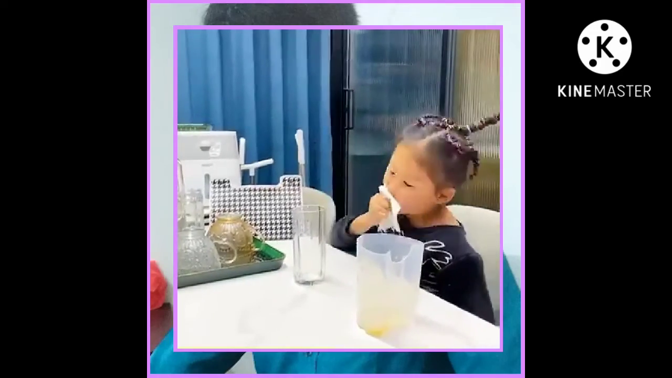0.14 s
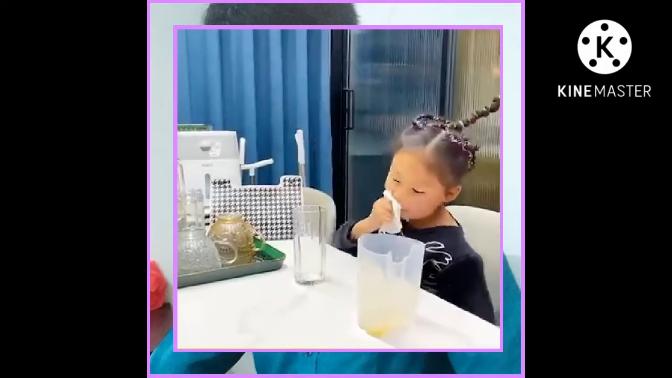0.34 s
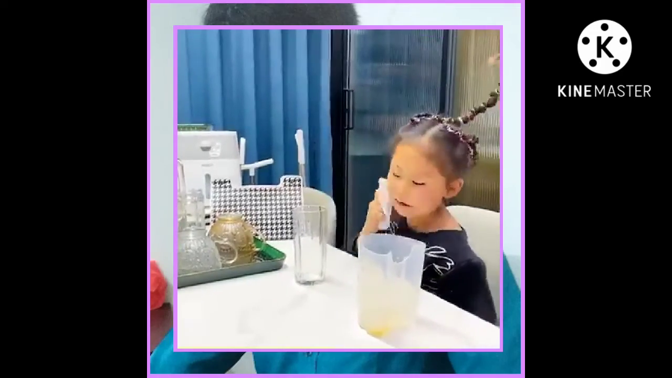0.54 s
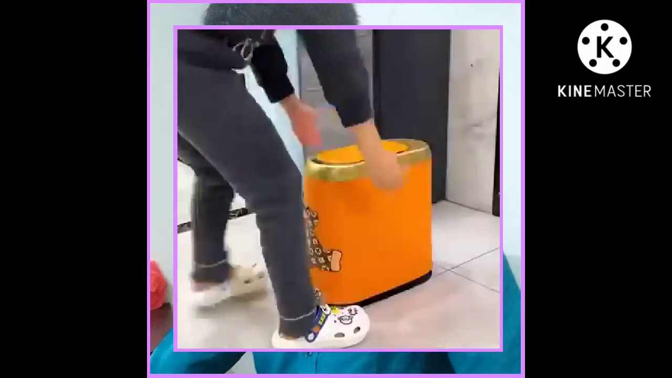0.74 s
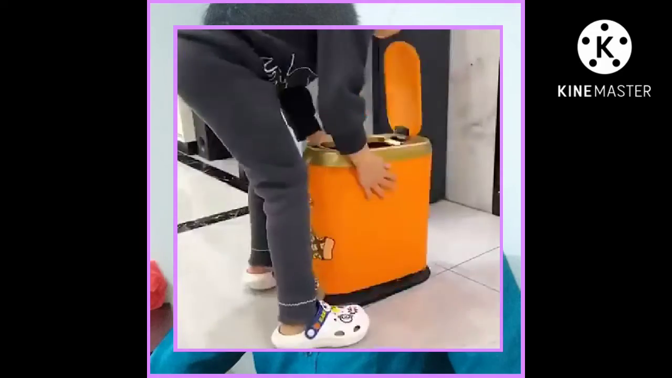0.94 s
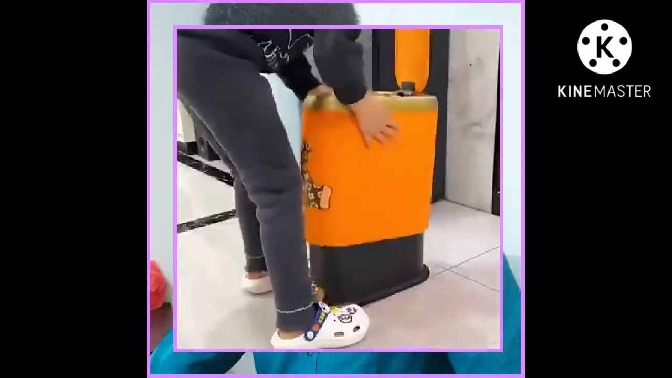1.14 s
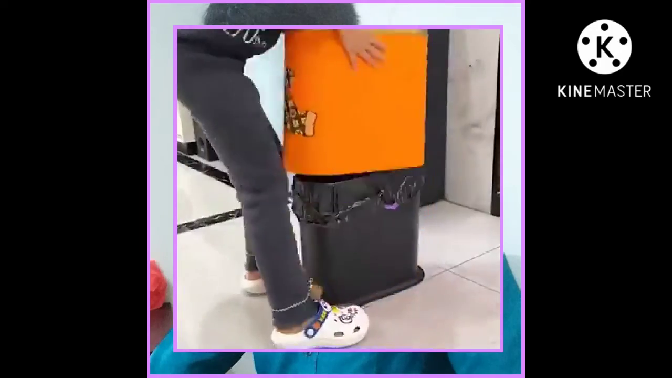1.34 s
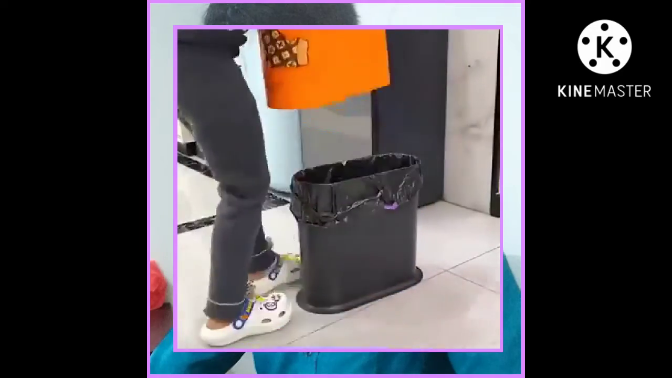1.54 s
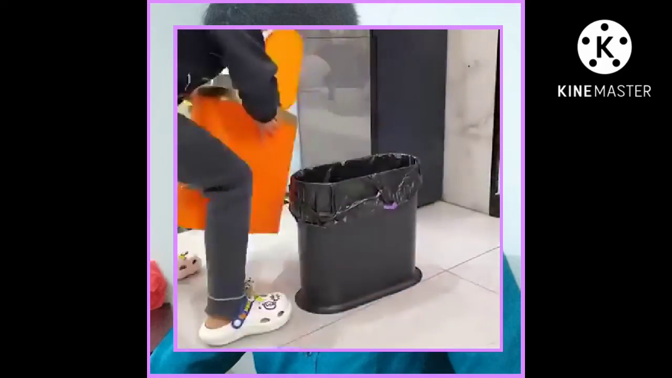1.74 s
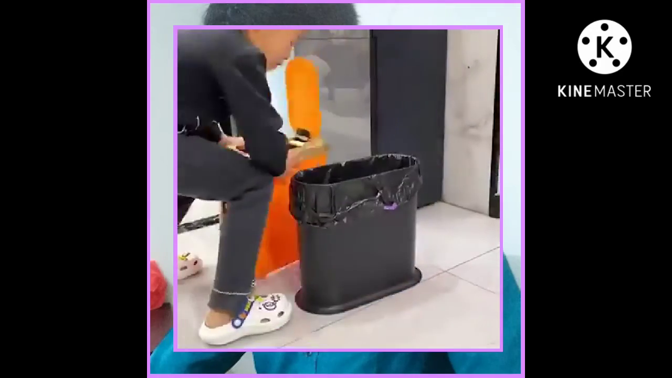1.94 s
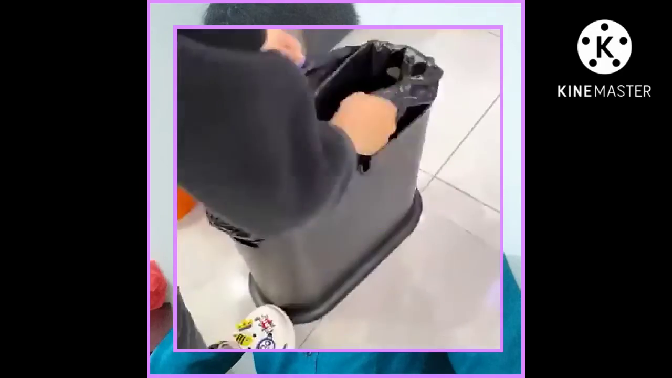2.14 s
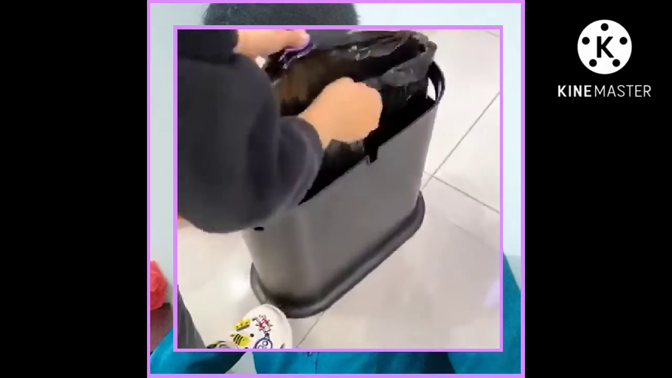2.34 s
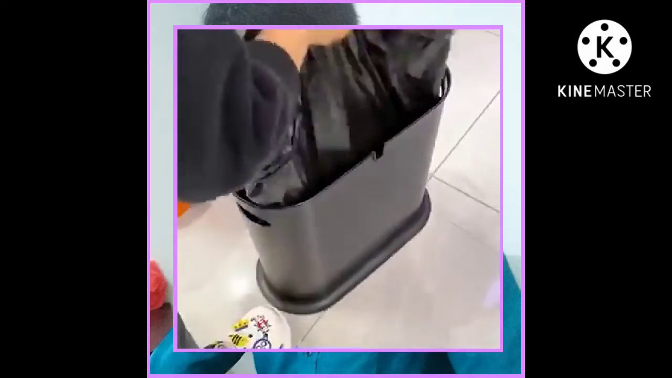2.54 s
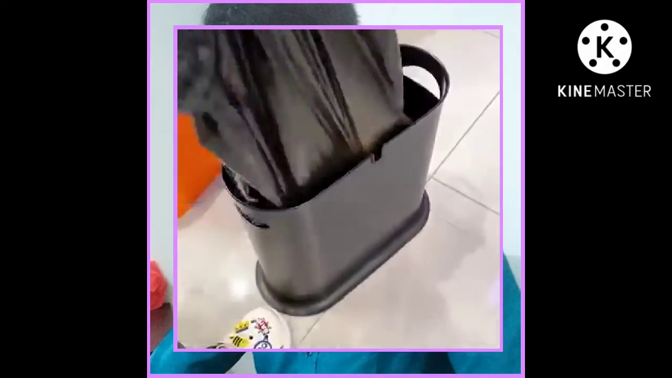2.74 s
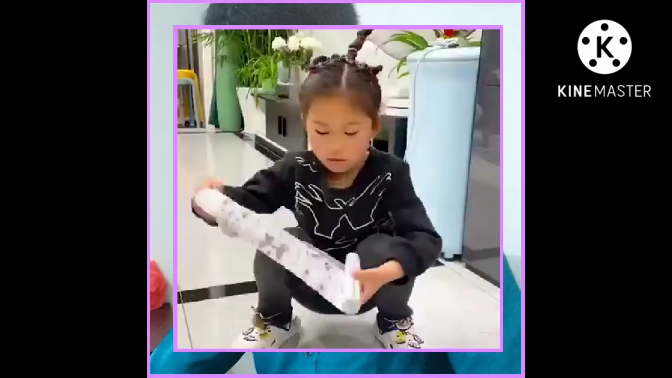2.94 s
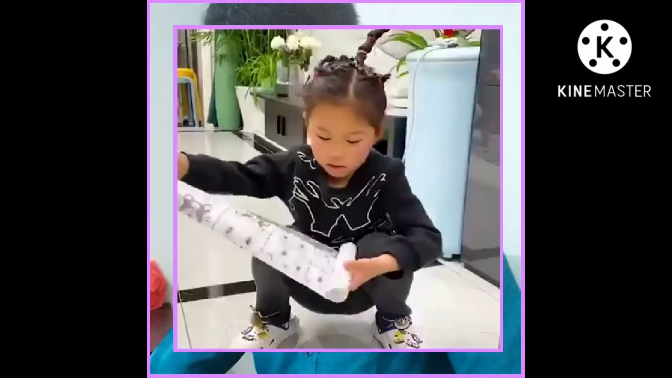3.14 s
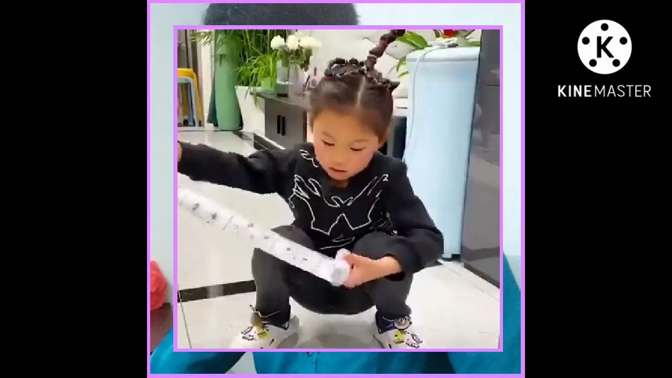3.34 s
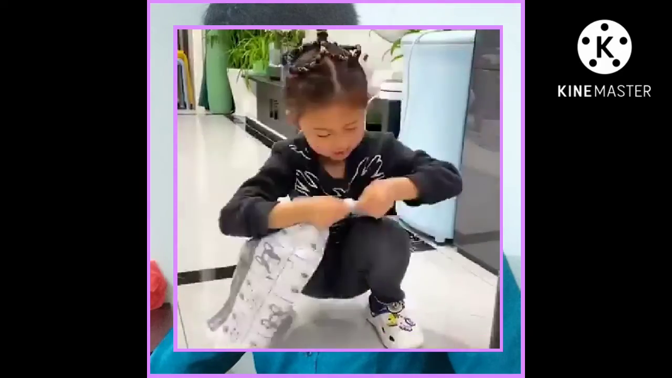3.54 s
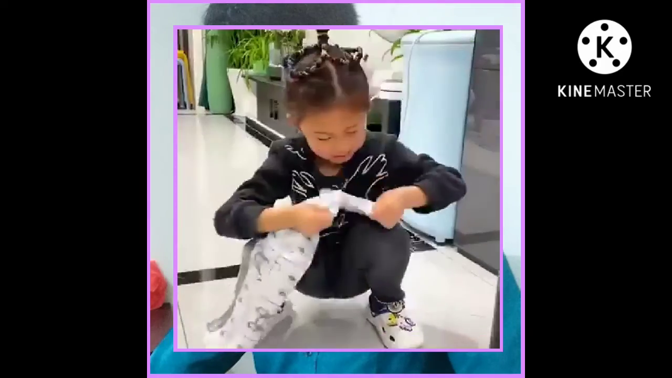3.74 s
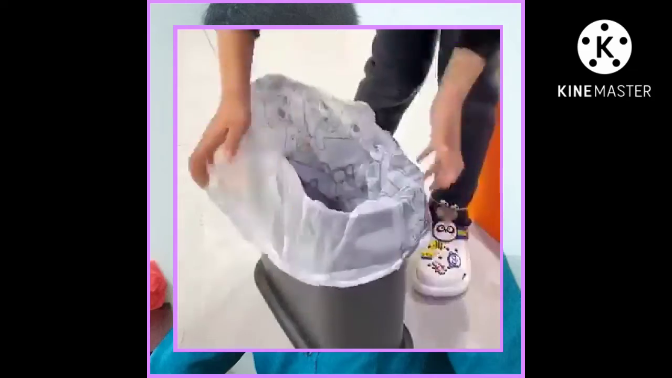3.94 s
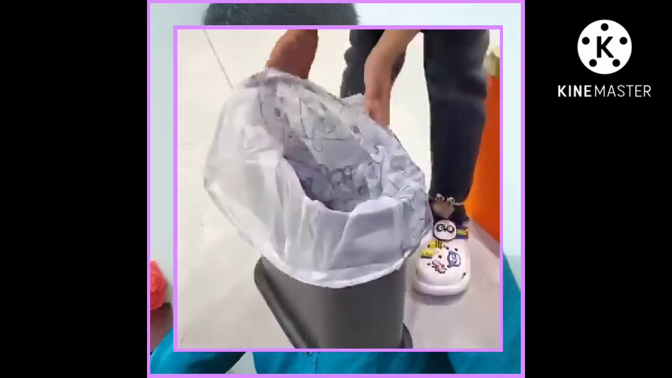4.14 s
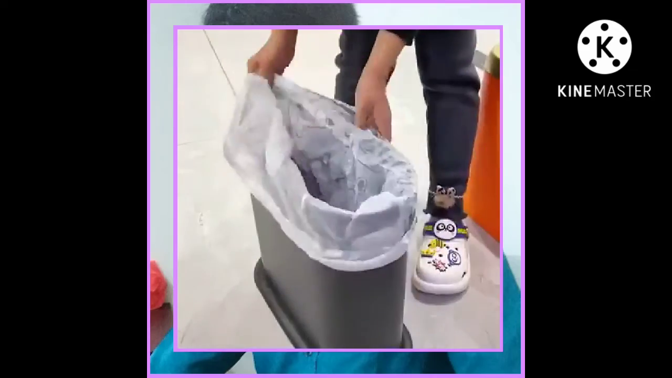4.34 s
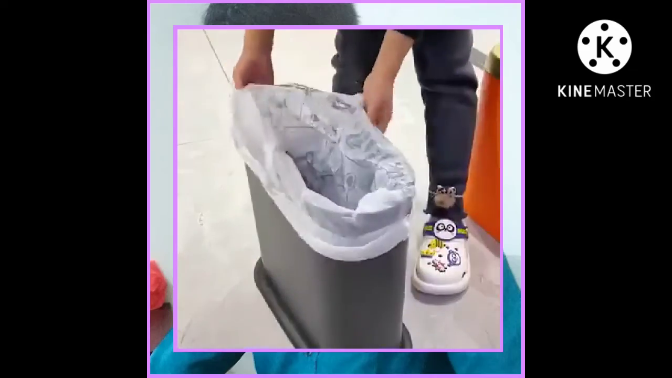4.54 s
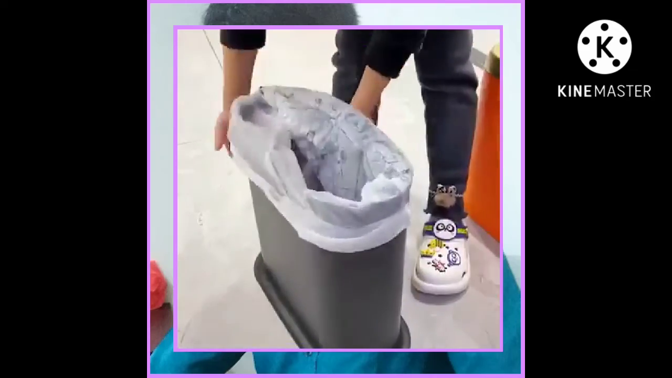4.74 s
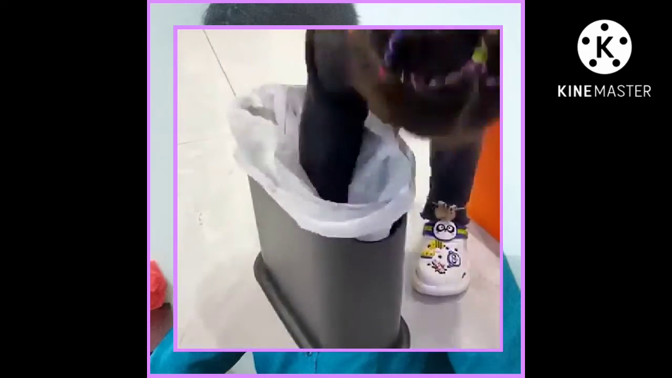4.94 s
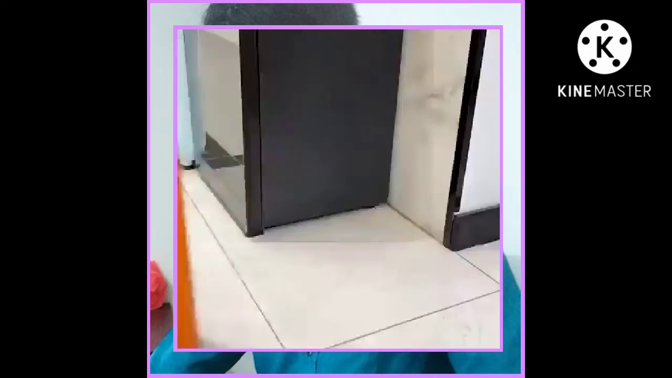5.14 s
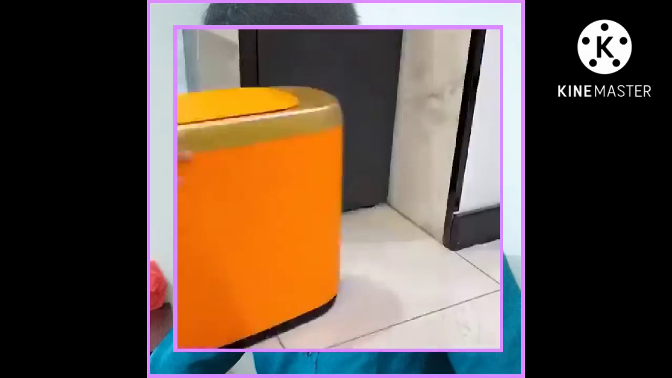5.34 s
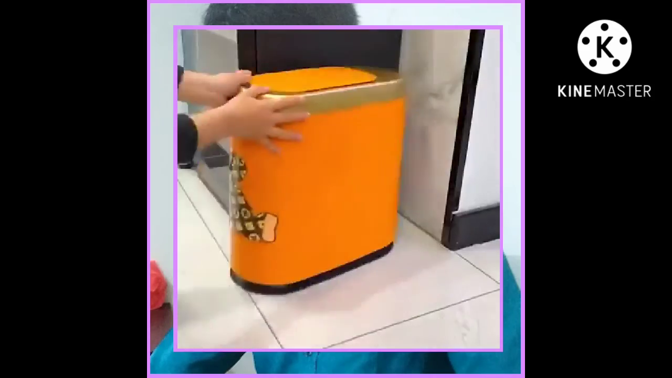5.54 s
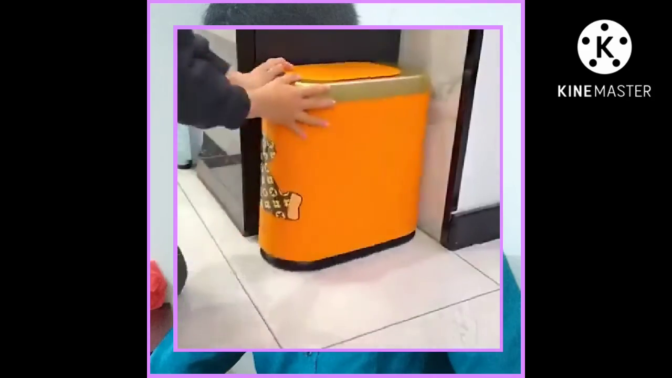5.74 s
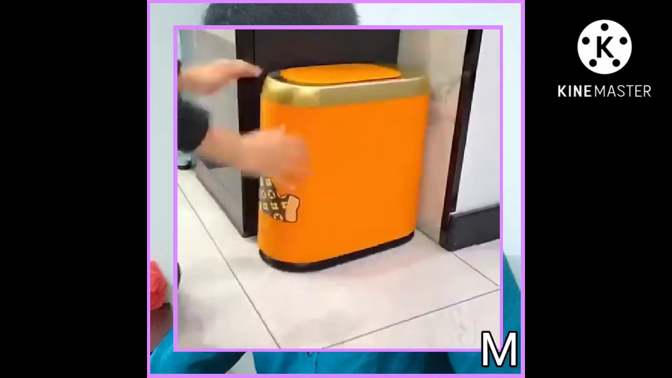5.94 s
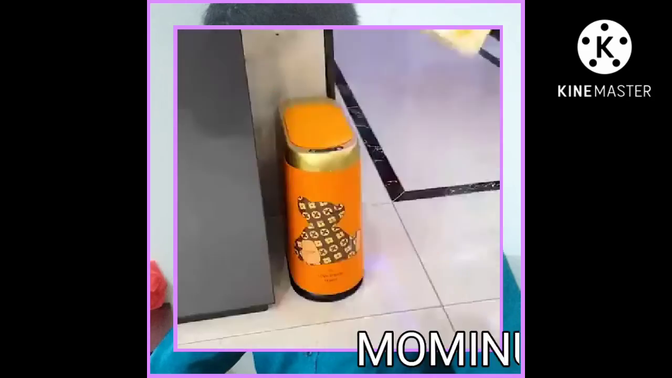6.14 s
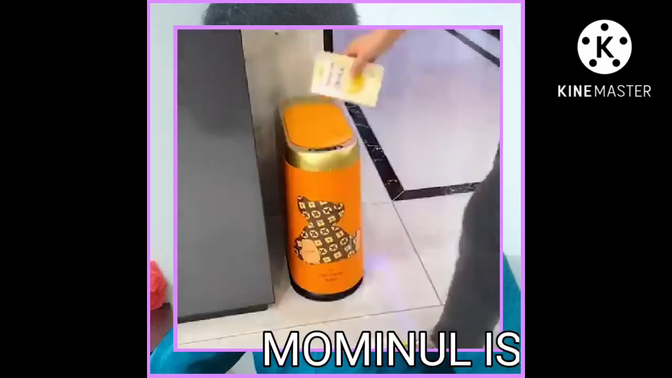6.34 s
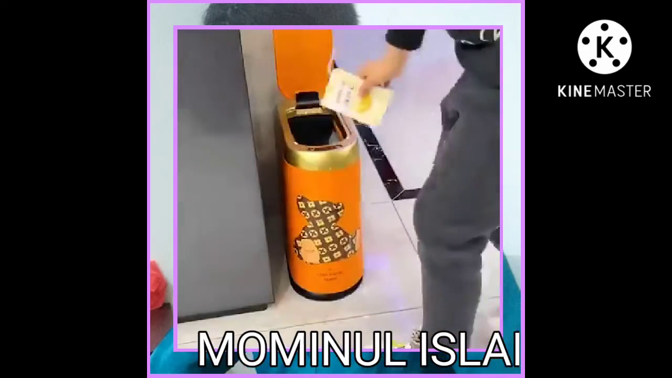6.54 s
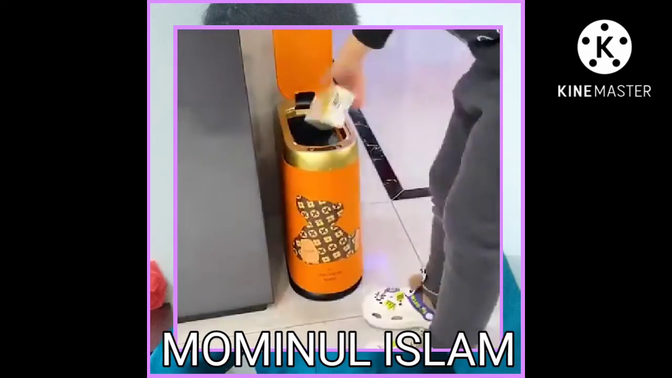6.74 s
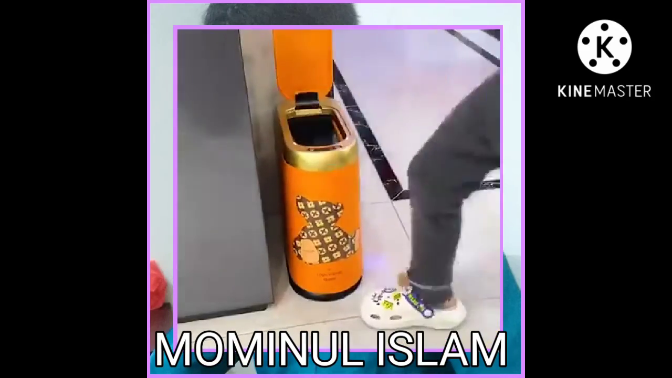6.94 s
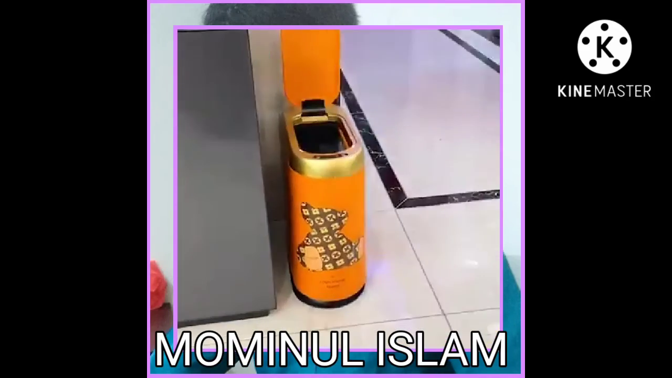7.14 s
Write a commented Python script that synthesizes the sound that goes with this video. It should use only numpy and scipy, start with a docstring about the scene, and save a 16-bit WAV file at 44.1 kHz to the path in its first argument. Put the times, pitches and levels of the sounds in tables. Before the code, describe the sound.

A plastic bin cover slides off with hollow knocks, then thin liner film crinkles loudly before the cover drags back and something drops in.

```python
"""Sleeves brush faintly over a low hum, then a wastebasket gets a new liner in a tiled room: the plastic cover
is lifted off, the old bag pulled out, a thin new one torn from the roll and spread over the rim,
the cover slid back across the floor, and litter drops in.
Strokes gate random snaps through resonant bands for film and plastic, and so shake the hollow walls;
knocks boom, clack and rattle, light ticks fall between, and a small hard room answers."""
import sys
import numpy as np
from scipy import signal
from scipy.io import wavfile

SR = 44100
rng = np.random.default_rng(int(sys.argv[2]) if len(sys.argv) > 2 else 0)


def persist_wave(psi):
    """Save psi, clipped to +-1, as 16-bit WAV."""
    counts = np.round(np.clip(psi, -1, 1) * 32767).astype(np.int16)
    wavfile.write(sys.argv[1], SR, np.atleast_2d(counts).T)


N = 316846
TIME_S = np.arange(N) / SR
LEFT_RIGHT = np.array([[1], [-1]])
# Table levels are relative; most layers are trimmed where they are mixed.

# pulls on the thin film: t/s, length/s, crease level/dB, swell over pull/dB, folds re creases/dB
LINER_PULLS = [ (2.235, 0.25, -36, 1.5, 1.5), (2.375, 0.018, -42, 7, 18), (2.42, 0.071, -32, -4, 14),
               (2.5, 0.13, -32.5, 7.5, 5.5), (2.6, 0.13, -30.5, 1, 5), (2.72, 0.071, -29, -6.5, -15),
               (2.795, 0.058, -24.5, 3.5, -8), (2.86, 0.13, -32, -1, 1), (2.985, 0.14, -24, -0.5, -1),
               (3.17, 0.12, -57.5, -17, 12.5), (3.29, 0.21, -57, 16, 12), (3.48, 0.2, -54.5, 3, 15.5),
               (3.741, 0.062, -22.5, 1, 4.5), (3.82, 0.12, -36.5, -16, 2.5), (3.953, 0.12, -30.5, 6, 0),
               (4.11, 0.17, -43.5, 3.5, 8), (4.29, 0.106, -46.5, 3, 9), (4.395, 0.092, -33, 7.5, 3.5),
               (4.51, 0.13, -34.5, 1.5, 3), (4.66, 0.31, -36.5, 0, 2.5), (4.98, .09, -52.5, 3, 2),
               (5.07, 0.11, -30.5, -0.5, 4.5), (5.21, .12, -45, -12, 4.5), (6.99, 0.084, -34.5, 2.5, 5),
               (7.08, 0.13, -42.5, 0, 8.5)]
LINER_ATTACK_S, LINER_RELEASE_S = 0.074, 0.062   # per 60 dB


def liner_pulls():
    """Hands pull the film: gains of small creases and of large folds."""
    return strokes(LINER_PULLS, LINER_ATTACK_S, LINER_RELEASE_S)


# small creases: f/Hz, level/dB per Hz
CREASE_SPECTRUM = [(1290, -57), (2200, -7.5), (2370, -7), (3140, -11), (3830, -10.5), (4960, -6),
                   (6410, -3.5), (7440, 3.5), (7880, -17), (8290, 16), (8570, -12), (9780, -15),
                   (11400, -25), (14900, -15), (16000, -31)]
# large folds, film off the rim: f/Hz, level/dB per Hz
FOLD_SPECTRUM = [(260, 5.5), (450, -9), (539, -39.5), (673, 9), (1070, -10), (1460, 6), (1590, 0),
                 (2460, -3), (3200, -3), (4160, -37), (7040, -120)]
# large folds stretched over the rim: f/Hz, level/dB per Hz
RIM_FOLD_SPECTRUM = [(260, 13.5), (450, -26), (700, 1.5), (950, -1.5), (1260, -7.5), (1490, 0), (1740, -30),
                     (2050, -0.5), (3200, -5.5), (4160, -4.5), (7040, -63)]
RIM_FROM_S, RIM_TO_S = 3.92, 5.36   # film stretched over the rim


def liner(crinkle, flex):
    """Small creases snap in dense clumps; large folds buckle lower, with another colour over the rim."""
    on_rim = (TIME_S > RIM_FROM_S) & (TIME_S < RIM_TO_S)
    clumps = flicker(rate=55, depth_db=1.5)
    snaps = grains(per_s=6600, spread_db=0.5) * crinkle * clumps
    creases = colour(snaps, CREASE_SPECTRUM, patchy_db=1.1, rate=25.0, count=22)
    buckles = grains(per_s=1800, spread_db=-1.5) * flex * clumps
    folds = colour(buckles * ~on_rim, FOLD_SPECTRUM, patchy_db=-1.0, rate=29.0, count=10)
    taut = colour(buckles * on_rim, RIM_FOLD_SPECTRUM, patchy_db=3.0, rate=9, count=18)

    film = from_db(-1.5) * narrow(creases, share=0.58) + from_db(-13.0) * folds
    film = shifting_paths(film, longest_s=.014, fall_db=-2.0, rate=1.4)
    # broad, slowly moving peaks and hollows: a swirling colour in the rustle
    film = shifting_paths(film, longest_s=.003, fall_db=2, rate=5, count=8)
    film = film + from_db(-3.5) * facing_creases(crinkle, on_rim)
    film = film + from_db(-11.5) * taut

    # the open tub under the stretched film swallows one narrow band
    swallowed = band(film, 1620, 1900, order=2, kind="bandstop")
    return np.where(on_rim, swallowed, film) * from_db(0.32 * LEFT_RIGHT)


def facing_creases(crinkle, on_rim):
    """Creases facing the listener, by few short paths: crisp when bunched, a fine rustle on the rim."""
    bunched = grains(per_s=300, spread_db=2.0)
    spread = grains(per_s=1500, spread_db=1.5)
    facing = np.where(on_rim, spread, bunched) * flicker(rate=60, depth_db=2.5)
    crisp = band(facing * crinkle, 2200, 8000, order=2)
    crisp = signal.sosfilt(signal.butter(4, 8500, fs=SR, output="sos"), crisp)
    return shifting_paths(crisp, longest_s=.006, fall_db=0, rate=3, count=4)


# taut folds giving way: t/s, level/dB, rise per factor e/s, t60/s, pitch re film modes
CRUMPLES = [(2.254, -49, .003, 0.065, 0.83), (2.447, -38, .012, 0.078, 1.12),
            (2.656, -31, .003, 0.053, 0.78), (2.737, -21.5, 0.022, 0.095, 0.96),
            (2.828, -33, 0.0032, 0.036, 0.98), (2.846, -77, 0.0079, 0.084, 0.74), (2.93, -53, .003, .07, 1),
            (2.991, -40, 0.0044, 0.088, 0.59), (3.036, -26, 0.011, 0.23, 0.69),
            (3.072, -25.5, .01, 0.093, 0.75), (3.105, -26, 0.0027, 0.094, 1.2),
            (3.778, -21.5, 0.011, 0.17, 0.86), (3.95, -35.5, 0.0029, 0.19, 1.09),
            (4.06, -42.5, 0.032, 0.54, 1.22), (4.46, -42, 0.0074, 0.26, 1.14),
            (5.075, -33, 0.0036, 0.099, 1.1)]
# taut film modes at pitch 1: f/Hz, width/Hz, level/dB
FILM_MODES = [(1475, 130, -16), (2464, 24, 0), (2950, 17, 0.5), (4170, 35, -14), (4700, 60, -12),
              (5300, 150, -12), (6050, 43, 3), (6670, 14, 4), (7460, 42, -14), (8610, 55, 10)]


def crumples():
    """A fold collapses in a rush of snaps that ring the film, higher the tauter it is."""
    out = np.zeros((2, N))
    snaps = grains(per_s=3700, spread_db=-2.5)
    for s, level_db, rise_s, t60_s, pitch in CRUMPLES:
        near = around(s, before_s=.1, after_s=.3)
        rush = snaps[:, near] * blow(TIME_S[near] - s, rise_s, t60_s)
        out[:, near] += from_db(level_db) * ring(rush, FILM_MODES, pitch)
    return from_db(-10.5) * narrow(out, share=0.48)


# slides of cover, lid and sleeves: t/s, length/s, hiss level/dB, swell over slide/dB, scrape re hiss/dB
COVER_SLIDES = [ (0.0, 0.19, -60, -2, -17), (0.17, 0.24, -72, 6, 0), (0.445, 0.3, -55, 10.5, -8),
                (0.81, 0.1, -60, -6, 4), (0.845, 0.037, -49.5, -2, 0), (0.96, 0.21, -49, -3.5, 4.5),
                (1.17, 0.33, -46, 8, -4), (1.51, 0.071, -50, -4, -3.5), (1.6, 0.47, -57.5, -3.5, 3),
                (5.374, 0.052, -42.5, 2.5, 8.5), (5.43, 0.078, -44, -10, 6), (5.48, 0.26, -43, -1, 8.5),
                (5.75, 0.2, -48, -2.5, 7.5), (5.97, 0.17, -56.5, -5, 5), (6.14, 0.12, -52, 3, -4.5),
                (6.31, 0.13, -64, -18, 6), (6.46, 0.087, -56, -6, 6), (6.53, 0.15, -62.5, 0, 12.5),
                (6.7, 0.1, -60.5, -2.5, 10), (6.82, 0.13, -64, -16, -0.5)]
COVER_ATTACK_S, COVER_RELEASE_S = 0.056, 0.11   # per 60 dB


def cover_slides():
    """Hands and sleeves move over the plastic: gains of hiss and of scrape."""
    return strokes(COVER_SLIDES, COVER_ATTACK_S, COVER_RELEASE_S)


# fine slips; also colours the cracks: f/Hz, level/dB per Hz
HISS_SPECTRUM = [(1530, -16), (2600, -4.5), (3900, -4), (4770, -2), (5150, 0), (6180, -1), (6970, 7),
                 (7580, -3.5), (8240, -2.5), (10300, -24), (14800, -16.5), (16000, -24)]
# coarse friction: f/Hz, level/dB per Hz
SCRAPE_SPECTRUM = [(240, -59), (400, 0), (776, 14), (849, 17), (904, 11.5), (1210, 10), (1390, -3),
                   (1530, 15.5), (2130, 4.5), (3400, 21.5), (4420, -76), (7480, -120)]
# hollow cover resonances: f/Hz, width/Hz, level/dB
SHELL_MODES = [(158, 18, 0.5), (1130, 46, -39), (1487, 86, -20), (1974, 53, -0.5), (2190, 33, -22),
               (2760, 17, -8)]


def cover(hiss, scrape):
    """Plastic slides over film and tile: countless small slips, a hiss over a scrape that rings the shell."""
    slips = flicker(rate=70, depth_db=1.6)
    fine_slips = grains(per_s=12000, spread_db=1.8) * hiss * slips
    fine = colour(fine_slips, HISS_SPECTRUM, patchy_db=1.4, rate=12, count=14)
    friction = grains(per_s=1100, spread_db=2.0) * scrape * slips
    coarse = colour(friction, SCRAPE_SPECTRUM, patchy_db=1.5, rate=16, count=12)
    shell = ring(friction, SHELL_MODES)
    sliding = from_db(-2.0) * narrow(fine, share=1.0) + from_db(-6.0) * coarse
    sliding = shifting_paths(sliding, longest_s=.014, fall_db=4.5, rate=4.45)
    return sliding + from_db(-15.0) * shell


# shaken hollow walls: f/Hz, level/dB per Hz
RUMBLE_SPECTRUM = [(18, -36), (30, -36), (59, -4.5), (96, -13.5), (163, -5), (209, 4.5), (301, 5),
                   (467, -16.5), (536, -16), (600, -5), (780, -26), (1320, -120)]
# rumble/dB at a force of 0 dB; dB of rumble per dB of force
TUG_RUMBLE_DB, TUG_FOLLOWS = -23, 0.71
DRAG_RUMBLE_DB, DRAG_FOLLOWS = -23.5, 0.58
CLEAR_FROM_S, CLEAR_TO_S = 3.16, 3.72   # film held clear of the bin
GRIP_S = 0.79   # cover first touched


def walls(flex, scrape):
    """Tugs on the liner and drags of the cover shake the hollow walls."""
    in_bin = (TIME_S < CLEAR_FROM_S) | (TIME_S > CLEAR_TO_S)
    tug = from_db(TUG_RUMBLE_DB) * flex ** TUG_FOLLOWS * in_bin
    drag = from_db(DRAG_RUMBLE_DB) * scrape ** DRAG_FOLLOWS * (TIME_S > GRIP_S)
    shaken = grains(per_s=1200, spread_db=1.5) * np.hypot(tug, drag)
    return colour(shaken, RUMBLE_SPECTRUM, patchy_db=5.5, rate=4.6, count=8)


# knocks on bin, cover, lid and roll: t/s, boom level/dB, nominal wall f/Hz, clack level/dB,
# rattle level/dB, crack level/dB, nominal t60/s, right-ear lag/s
KNOCKS = [ (0.96, -28, 397, -42, -38, -44, 0.084, 0.0032),
          (1.013, -13, 164, -42.5, -45, -44, 0.094, -0.0025),
          (1.116, -15.5, 596, -34, -28.5, -48, 0.03, 0.00056),
          (1.14, -45, 603, -55, -39, -45, 0.046, 0.00036),
          (2.131, -12, 311, -20, -20.5, -25.5, 0.071, 0.011),
          (2.146, -4.5, 361, -19, -17, -26, 0.035, 0.012), (2.189, -34, 300, -31, -22, -63, 0.04, 0.01),
          (2.205, -11.5, 284, -27.5, -31, -57, 0.017, .014),
          (2.37, -18.5, 172, -40.5, -22, -54, 0.088, 0.0086),
          (2.454, -24, 197, -35, -32, -53, 0.034, -0.022), (2.465, -13, 155, -48, -39, -49, 0.13, -0.00017),
          (2.516, -15.5, 308, -45, -35, -49, 0.08, -.006),
          (2.615, -16, 145.5, -27.5, -22.5, -47, 0.084, 0.0057),
          (2.745, -22, 707, -32, -50, -45, 0.19, -0.0023), (2.828, -23, 746, -32.5, -60, -38, 0.27, 0.0057),
          (3.484, -43, 274, -62, -62, -67, 1, -0.0043), (3.621, -40, 750, -58, -66, -65, 0.09, 0.013),
          (3.674, -35, 303, -58, -64, -63, 0.072, -0.002), (3.753, -20.5, 125, -32, -18, -30, 0.19, 0.024),
          (3.791, -20, 126, -27.5, -48, -41, 0.23, 0.004),
          (4.205, -23.5, 121, -49, -47.5, -56, 0.073, .009),
          (4.681, -14, 274, -42, -60, -57, 0.077, 0.0014), (5.072, -32, 137, -50, -52, -34, 0.088, -0.0041),
          (5.439, -19, 176, -39, -26.5, -47, 0.16, -0.0021), (5.576, -25.5, 159, -43, -50, -56, 0.49, .001),
          (5.659, -19.5, 160, -41, -54, -61, 0.27, .001),
          (5.902, -12.5, 255, -26, -43, -45.5, 0.075, 0.001),
          (5.918, -8.5, 202.6, -25.5, -25.5, -37.5, 0.12, -0.0074),
          (5.935, -7, 154.5, -28, -38, -48, 0.096, 0.017),
          (5.969, -22, 204, -42.5, -47, -62, 0.28, 0.000015),
          (6.062, -30.5, 132, -68, -71, -74, 0.23, 0.0074), (6.16, -35, 483, -66, -75, -66, 0.12, .0004),
          (6.536, -30, 673, -44.5, -43, -64, 0.13, 0.0061),
          (6.736, -33, 278, -33.5, -34.5, -43, 0.028, -0.015),
          (6.756, -28, 238, -46, -70, -73, 0.34, -0.0056),
          (6.962, -13.5, 731, -19, -25, -40, 0.055, 0.0074), (6.969, -18, 347, -48, -31, -49, 0.15, 0.0096),
          (6.997, -28.5, 626, -37, -46, -31.5, 0.29, 0.011),
          (7.148, -30.5, 135, -38, -44, -50, 0.16, -0.00011)]
# struck wall, with the whole tub rocking below: multiple of wall f, level/dB
WALL_MODES = [(0.456, -22), (1.002, 1.5), (1.53, -19.5), (2.06, -18.5)]
BOOM_RISE_S = 0.0077   # per factor e
WAVER = 7.4   # phase wander, rad per root second at 170 Hz and t60 0.11 s


def wall_booms():
    """Each struck wall rings at its own pitch, its modes dying faster the higher they are."""
    booms = np.zeros((2, N))
    for s, level_db, hz, _, _, _, t60_s, lag_s in KNOCKS:
        near = around(s, before_s=.05, after_s=.4)
        t = TIME_S[near] - s
        heard = t + lag_s / 2 * LEFT_RIGHT
        # the soft wall bends as it rings, blurring its high and short notes most
        waver = WAVER * np.sqrt(hz / 170 * 0.11 / t60_s)
        for multiple, mode_db in WALL_MODES:
            bend = waver * np.cumsum(rng.standard_normal((2, len(t))), axis=1) / np.sqrt(SR)
            phase = 2 * np.pi * (multiple * hz * heard + rng.random()) + bend
            swell = blow(heard - .003, BOOM_RISE_S, t60_s / multiple)
            booms[:, near] += from_db(level_db + mode_db) * swell * np.sin(phase)
    return booms


# plastic edges ticking: t/s, level/dB
TICKS = [(0.273, -60.5), (0.855, -47.5), (5.376, -48), (6.312, -50), (6.446, -48), (6.457, -41.5),
         (6.706, -45), (6.713, -55), (6.829, -49)]
TICK_RISE_S, TICK_T60_S = 0.0068, 0.027   # rise per factor e


def ticks():
    """Gain of light contacts of plastic edges, too light to make a wall boom."""
    gain = 0
    for s, level_db in TICKS:
        gain = gain + from_db(level_db) * blow(np.clip(TIME_S - s, -.5, .5), TICK_RISE_S, TICK_T60_S)
    return gain


# contacts on the wall: f/Hz, level/dB per Hz
CLACK_SPECTRUM = [(24, -40), (40, -63), (139, -0.5), (352, 11), (530, -7), (769, 17.5), (1100, -5.5),
                  (1770, -15), (2600, -51), (4420, -43)]
# loose rim chattering: f/Hz, level/dB per Hz
RATTLE_SPECTRUM = [(1000, -17.5), (1500, 12), (2300, 0), (3200, 1), (4200, -14.5), (6000, -8.5)]
# plastic tub modes: f/Hz, level/dB, t60/s
TUB_MODES = [(760, -21, 0.074), (1285, -11, 0.15), (1773, -19, 0.12), (1920, -14, 0.09), (2260, -9, 0.13),
             (3160, -35, 0.16)]
CLACK_RISE_S, CRACK_MAX_T60_S = 0.0072, 0.053   # rise per factor e
CLACK_RING_SHARE = 0.97   # burst t60 re wall t60
TICK_RATTLE_DB = -3   # re the tick's crack


def knocks():
    """Bursts of contacts crack, rattle and clack through the tub while the struck walls boom."""
    force, chatter, edge = np.zeros((3, 2, N))
    for s, _, _, clack_db, rattle_db, crack_db, t60_s, lag_s in KNOCKS:
        near = around(s, before_s=.05, after_s=.4)
        heard = TIME_S[near] - s + lag_s / 2 * LEFT_RIGHT
        burst = blow(heard, CLACK_RISE_S, CLACK_RING_SHARE * t60_s)
        snap = blow(heard, CLACK_RISE_S, np.minimum(CRACK_MAX_T60_S, t60_s))
        # overlapping bursts add in power
        force[:, near] = np.hypot(force[:, near], from_db(clack_db) * burst)
        chatter[:, near] = np.hypot(chatter[:, near], from_db(rattle_db) * burst)
        edge[:, near] = np.hypot(edge[:, near], from_db(crack_db) * snap)
    tick = ticks()
    chatter = np.hypot(chatter, from_db(TICK_RATTLE_DB) * tick)
    edge = np.hypot(edge, tick)

    contacts = grains(per_s=2500, spread_db=-3.5)
    clacks = colour(contacts * force, CLACK_SPECTRUM, patchy_db=3.0, rate=9.4, count=12)
    rattles = colour(contacts * chatter, RATTLE_SPECTRUM, patchy_db=7.5, rate=3.3, count=7)
    cracks = colour(contacts * edge, HISS_SPECTRUM, patchy_db=-1.5, rate=98, count=8)
    tub = sum(from_db(db) * resonate(contacts * force, hz, t60_s) for hz, db, t60_s in TUB_MODES)
    mix = from_db(-7.5) * wall_booms() + from_db(-2.5) * clacks + from_db(-3.0) * rattles
    return mix + from_db(-1.5) * cracks + from_db(-6.0) * tub


SLAP_LOW_HZ, SLAP_HIGH_HZ = 300, 1500
SLAP_DB = 7   # peak re the clack level in KNOCKS


def slaps():
    """The first contact of each knock is one hard push on the wall, heard by each ear in its turn."""
    pushes = np.zeros((2, N))
    for s, _, _, clack_db, _, _, _, lag_s in KNOCKS:
        left, right = int((s - lag_s / 2) * SR), int((s + lag_s / 2) * SR)
        pushes[[0, 1], [left, right]] = from_db(clack_db + SLAP_DB)
    heard = band(pushes, SLAP_LOW_HZ, SLAP_HIGH_HZ, order=3)
    return heard * pushes.max() / np.abs(heard).max()


# film peeling off the roll: t/s, length/s, hiss level/dB, swell over turn/dB, scuff re hiss/dB
ROLL_TURNS = [(3.17, 0.26, -59, -5, -14), (3.485, 0.088, -59, -10, 12.5), (3.62, 0.069, -58.5, -7, 18)]
# peeling film: f/Hz, level/dB per Hz
PEEL_SPECTRUM = [(7500, -24), (9500, -4), (12000, -5), (16000, -7)]
# fingers on the hollow roll: f/Hz, level/dB per Hz
SCUFF_SPECTRUM = [(240, -17), (290, 19), (420, -11), (580, 7), (800, -1.5), (1000, -24)]
PEEL_ATTACK_S, PEEL_RELEASE_S = 0.066, 0.095   # per 60 dB


def roll():
    """The layers of the roll part with a faint, airy hiss, and the fingers scuff its hollow core."""
    peel, grip = strokes(ROLL_TURNS, PEEL_ATTACK_S, PEEL_RELEASE_S)
    parting = grains(per_s=10000, spread_db=-1.0) * peel
    rubbing = grains(per_s=830, spread_db=3.5) * grip
    hiss = colour(parting, PEEL_SPECTRUM, patchy_db=5.5, rate=13.0, count=4)
    scuff = colour(rubbing, SCUFF_SPECTRUM, patchy_db=1.0, rate=5.2, count=6)
    return from_db(-2.5) * hiss + from_db(-0.5) * scuff


ROOM_T60_S = 0.11


def room(x, count=8):
    """Reflections circle between hard walls, on other paths for each ear."""
    out = np.zeros((2, N))
    lags = (rng.uniform(.014, .045, 2 * count) * SR).astype(int)
    for k, lag in enumerate(lags):
        ear, sign = k % 2, (-1) ** (k // 2)
        loop = x[ear].copy()
        gain = from_db(-60 * lag / SR / ROOM_T60_S)
        for i in range(lag, N, lag):
            loop[i:i + lag] += gain * loop[i - lag:i][:N - i]
        out[ear] += (loop - x[ear]) * sign   # echoes only
    return out / np.sqrt(count)


# quiet room: f/Hz, level/dB per Hz
ROOM_TONE_SPECTRUM = [(30, -9), (130, -9), (300, 16), (1000, 6), (6000, -18), (15000, -28)]
ROOM_TONE_DB = -80


def room_tone():
    """Quiet air: white noise through wandering bands."""
    noise = rng.standard_normal((2, N))
    return from_db(ROOM_TONE_DB) * colour(noise, ROOM_TONE_SPECTRUM, patchy_db=7.0, rate=4.8, count=8)


# low, blurred hum: f/Hz, width/Hz, level/dB
HUM_MODES = [(129, 21, -73.5), (260, 32, -76.5)]
HUM_UNTIL_S = 3.16


def hum():
    """Noise through low resonances, stopping at HUM_UNTIL_S."""
    return ring(rng.standard_normal((2, N)), HUM_MODES) * (TIME_S < HUM_UNTIL_S)


def strokes(rows, attack_s, release_s):
    """Gains of the bright and the low part: each stroke sets in, swells or sags, and lets go."""
    bright, low = 0, 0
    for s, length_s, level_db, swell_db, low_db in rows:
        t = TIME_S - s
        edges = np.maximum(-t, 0) / attack_s + np.maximum(t - length_s, 0) / release_s
        swell = swell_db * (np.clip(t / length_s, 0, 1) - .5)
        gain = from_db(level_db + swell - 60 * np.minimum(edges, 2))
        bright = bright + gain ** 2
        low = low + (gain * from_db(low_db)) ** 2
    return np.sqrt(bright), np.sqrt(low)


def blow(t, rise_s, t60_s):
    """Pressure builds as the parts meet, then dies away."""
    return np.exp(np.minimum(t, 0) / rise_s) * from_db(-60 * np.maximum(t, 0) / t60_s)


def grains(per_s, spread_db):
    """Random tiny snaps of uneven size, other ones at each ear; rms 1."""
    sizes = from_db(spread_db * np.minimum(rng.standard_exponential((2, N)), 4))
    struck = rng.random((2, N)) < per_s / SR
    return rms_one(struck * sizes * rng.standard_normal((2, N)))


def colour(drive, spectrum, patchy_db, rate, count):
    """Resonant bands whose strengths shift as the surface changes shape; keeps a white drive's level."""
    lowest_hz, highest_hz = max(spectrum[0][0], 20), min(spectrum[-1][0], SR * .45)
    edges = np.geomspace(lowest_hz, highest_hz, count + 1)
    out, power = 0, 0
    for k, (low, high) in enumerate(zip(edges, edges[1:])):
        gain = from_db(at_hz(spectrum, np.sqrt(low * high))) * flicker(rate, patchy_db)
        out = out + (-1) ** k * gain * band(drive, low, high, order=2)
        power += np.mean(gain ** 2) * 2 * (high - low) / SR
    return out / np.sqrt(power)


def resonate(drive, hz, t60_s):
    """One decaying two-pole mode; keeps the level of a white drive."""
    r, w = from_db(-60 / (t60_s * SR)), 2 * np.pi * hz / SR
    scale = np.sqrt((1 - r * r) / 2)
    return signal.lfilter([scale, 0, -scale], [1, -2 * r * np.cos(w), r * r], drive + 1e-18)


def ring(drive, modes, pitch=1):
    """Modes given by their widths ring side by side: t60 = ln(1000) / (pi * width)."""
    out = 0
    for hz, width_hz, db in modes:
        out = out + from_db(db) * resonate(drive, hz * pitch, np.log(1000) / (np.pi * width_hz))
    return out


def shifting_paths(x, longest_s, fall_db, rate, count=22):
    """Many short paths off the moving plastic open and close: a shifting comb of peaks and notches."""
    out, power = 0, 1e-9
    reaches = ((np.arange(count) + rng.random(count)) / count) ** 2
    for reach in reaches:
        weight = drift(rate) * from_db(-fall_db * reach)
        lag = int(reach * longest_s * SR)
        out = out + weight * np.pad(x, ((0, 0), (lag, 0)))[:, :N]
        power = power + weight ** 2
    return out / np.sqrt(power)


def narrow(x, share, low_hz=5500, high_hz=9500):
    """The brightest part comes straight from the source, more alike at both ears."""
    side = (x[0] - x[1]) / 2
    direct = band(side, low_hz, high_hz, order=1)
    return x - np.clip(share, 0, 1) * direct * LEFT_RIGHT


def flicker(rate, depth_db):
    """A gain that wanders at random about 1."""
    return from_db(depth_db * drift(rate))


def drift(rate, size=64):
    """Slow chance, held over size samples; rms 1."""
    r = np.exp(-2 * np.pi * size * rate / SR)
    noise = rng.standard_normal(N // size + 1001)
    slow = signal.lfilter([1], [1, -2 * r, r * r], noise)[1000:]   # settled part
    return np.repeat(rms_one(slow), size)[:N]


def band(x, low_hz, high_hz, order, kind="band"):
    """Butterworth band-pass or band-stop; the tiny offset avoids denormals."""
    sos = signal.butter(order, [low_hz, high_hz], kind, fs=SR, output="sos")
    return signal.sosfilt(sos, x + 1e-18)


def around(s, before_s, after_s):
    """Samples around a time."""
    return slice(max(int((s - before_s) * SR), 0), int((s + after_s) * SR))


def at_hz(points, hz):
    """Read a spectrum on a log-frequency axis."""
    table = np.array(points)
    return np.interp(np.log(hz), np.log(table[:, 0]), table[:, 1])


def from_db(db):
    """Level in dB to amplitude."""
    return np.exp(np.asarray(db) * (np.log(10) / 20))


def rms_one(x):
    """Scale to rms 1."""
    return x / np.sqrt(np.mean(x ** 2) + 1e-20)


def scene():
    """The strokes drive film, cover and walls; the handling sounds in the small hard room."""
    crinkle, flex = liner_pulls()
    hiss, scrape = cover_slides()
    handling = liner(crinkle, flex) + crumples() + cover(hiss, scrape) + walls(flex, scrape)
    handling = handling + knocks() + slaps() + roll()
    return handling + from_db(-2.0) * room(handling) + room_tone() + hum()


MIC_PEAK_HZ, MIC_PEAK_T60_S, MIC_PEAK_DB = 7930, 0.03, -19.5
CUTOFF_HZ = 15600


def record(dry):
    """The microphone port rings a little; the top is cut steeply."""
    picked_up = dry + from_db(MIC_PEAK_DB) * resonate(dry, MIC_PEAK_HZ, MIC_PEAK_T60_S)
    return signal.sosfilt(signal.ellip(12, .2, 80, CUTOFF_HZ, fs=SR, output="sos"), picked_up)


dry = scene()
out = record(dry)
persist_wave(out)
```